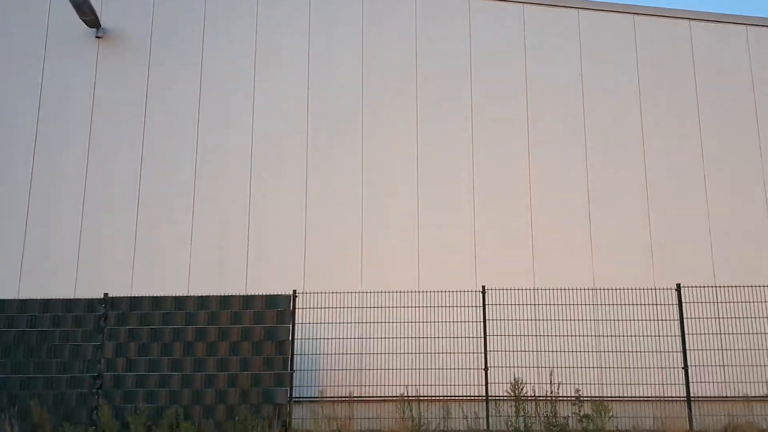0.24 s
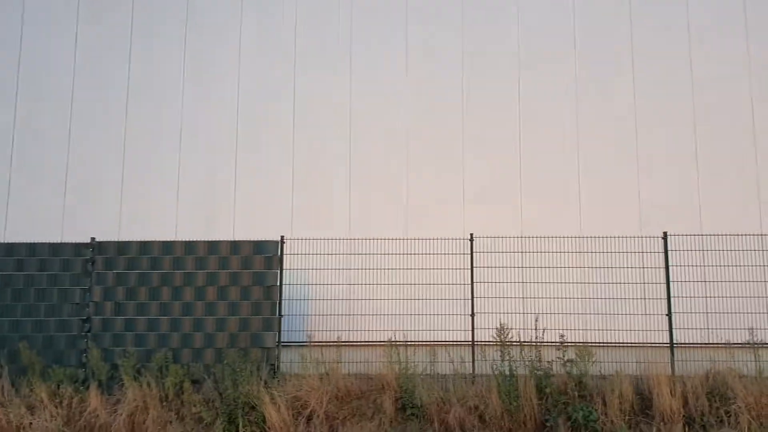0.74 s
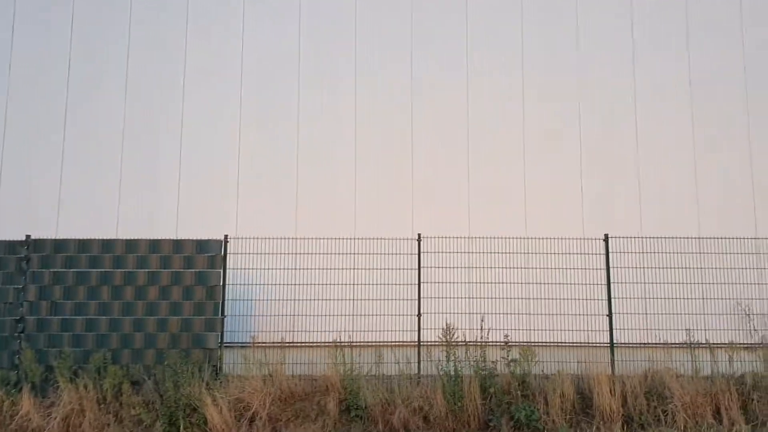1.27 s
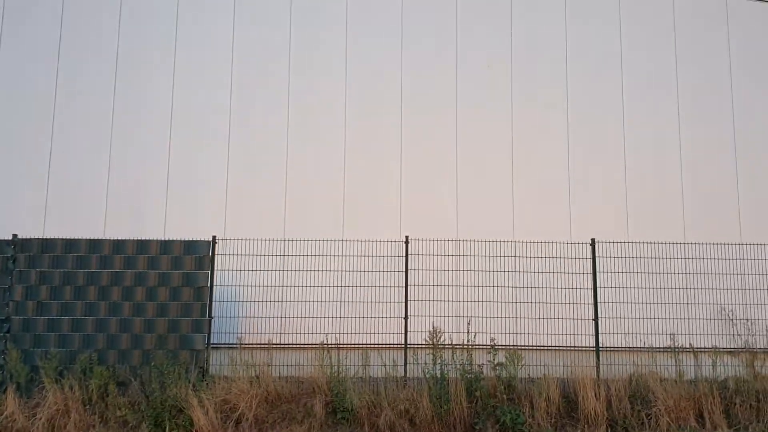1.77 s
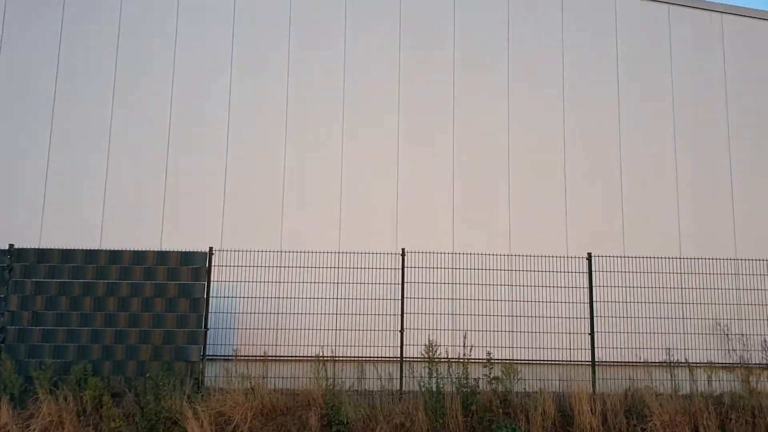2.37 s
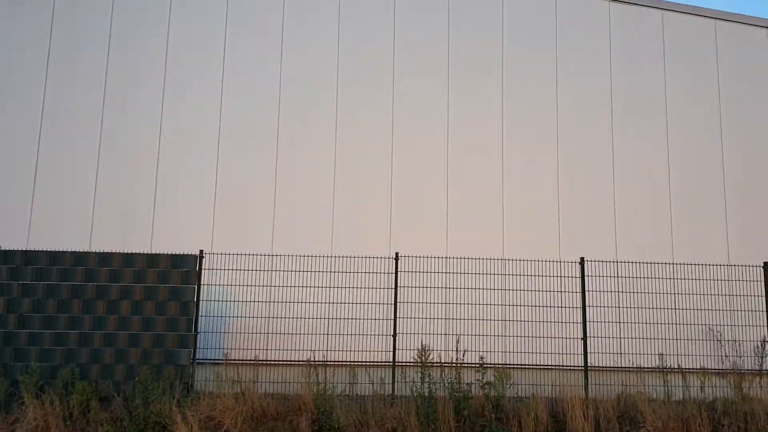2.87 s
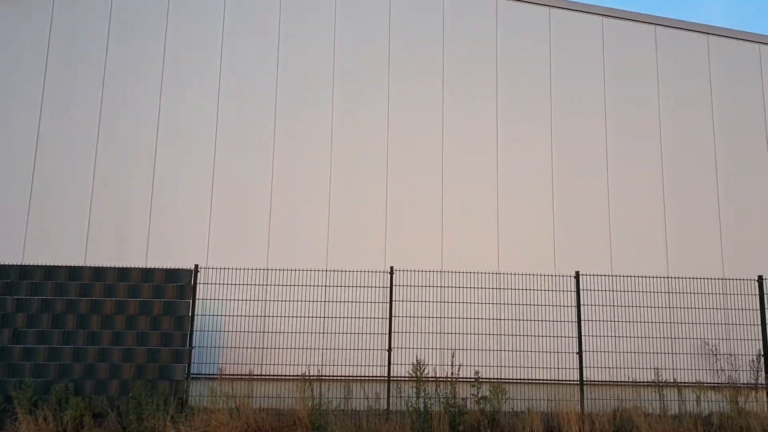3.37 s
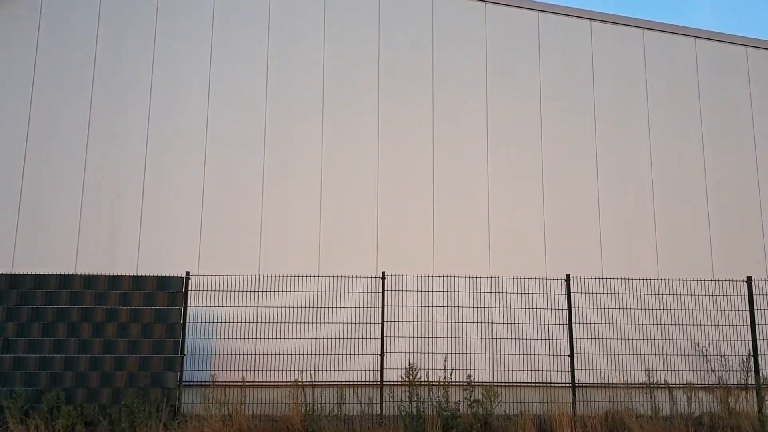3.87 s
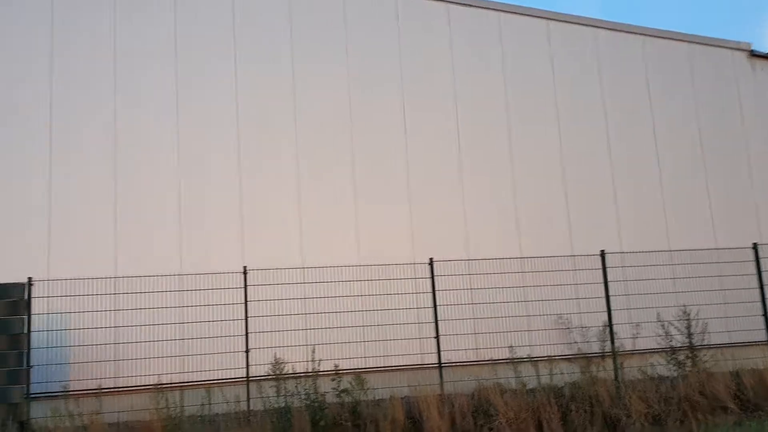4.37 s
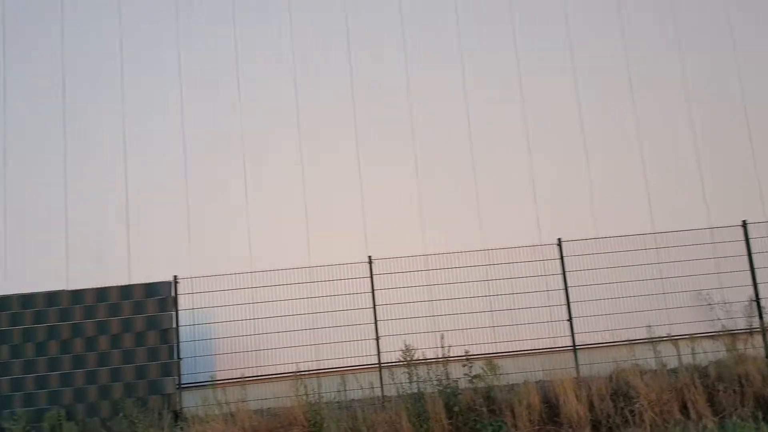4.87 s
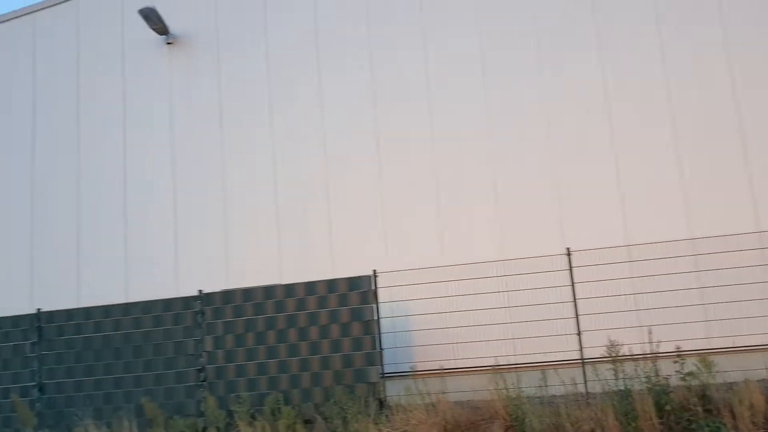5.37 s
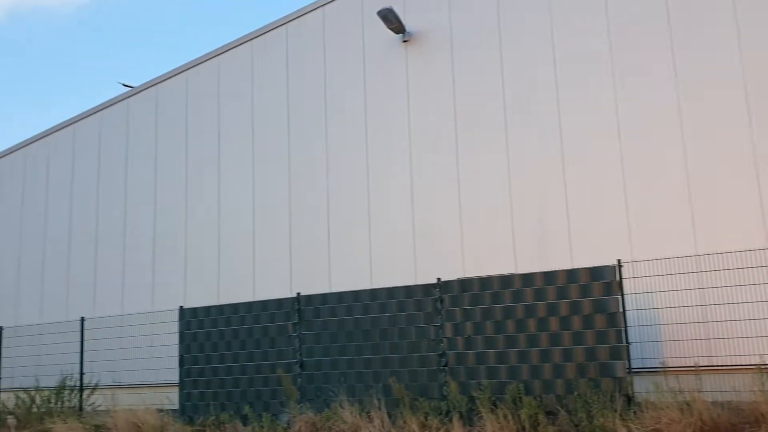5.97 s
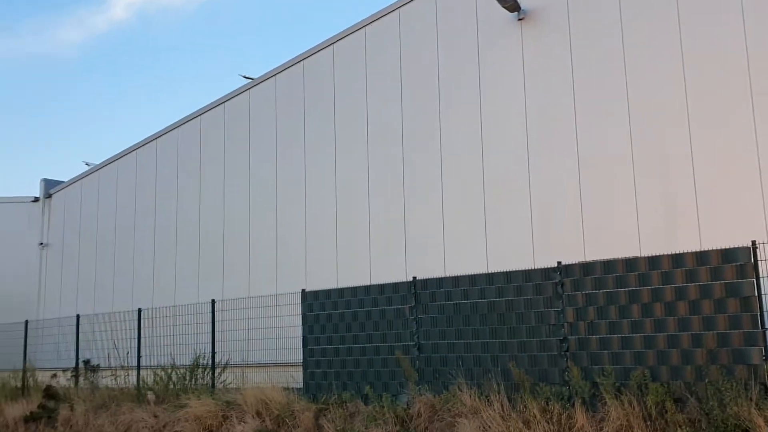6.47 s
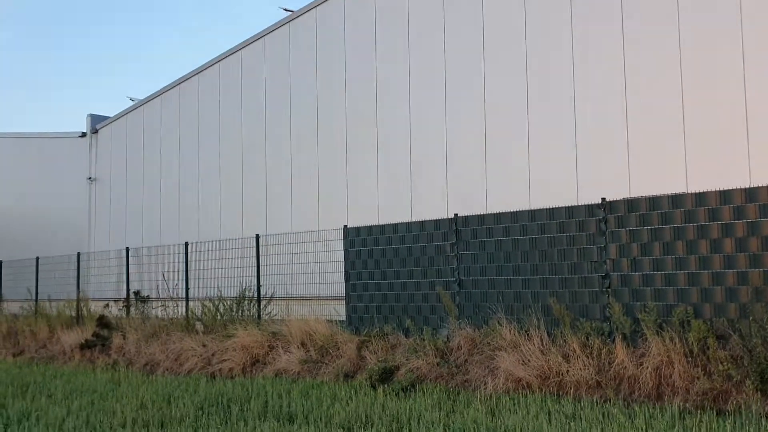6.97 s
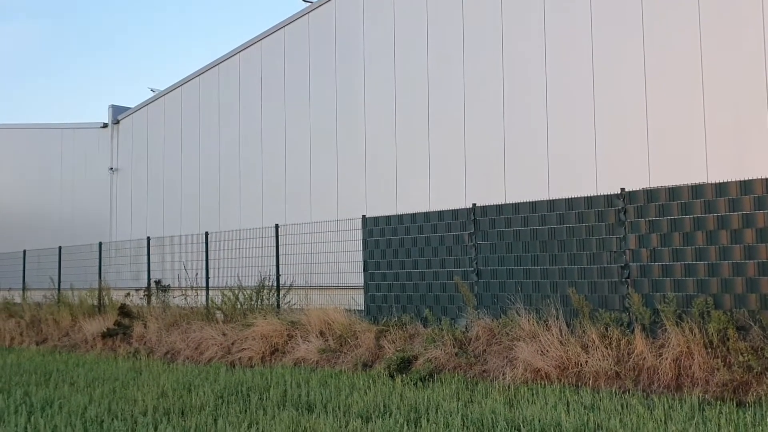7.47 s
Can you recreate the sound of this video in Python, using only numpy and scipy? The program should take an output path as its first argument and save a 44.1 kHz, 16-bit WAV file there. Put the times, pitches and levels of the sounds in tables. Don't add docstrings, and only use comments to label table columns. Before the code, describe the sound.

Heavy machine hums and roars steadily inside a metal hall while dry grass rustles and snaps underfoot; later a loud grinding surge thumps the wall.

```python
import sys
import numpy as np
from scipy import signal
from scipy.fft import rfft, irfft, next_fast_len
from scipy.io import wavfile
from scipy.ndimage import uniform_filter1d

SR = 44100
rng = np.random.default_rng(int(sys.argv[2]) if len(sys.argv) > 2 else 0)


def voltage_ratio(level):
    return 10 ** (np.asarray(level, float) / 20)


def unload_wav(signal):
    wavfile.write(
        sys.argv[1],
        SR,
        np.round(np.clip(np.atleast_2d(signal).T, -1, 1) * 32767).astype(np.int16),
    )


N = 341334

# start_s, beat_hz
KNIFE_SPEED = [(0, 33.42), (1.9, 33.42), (2.1, 33.55), (2.3, 33.44), (5.75, 33.45), (6.0, 32.9),
               (6.2, 32.8), (6.44, 31.6), (6.56, 32.2), (6.7, 33.45), (7.22, 33.45), (7.4, 33.2),
               (7.74, 33.4)]
# start_s, load_db
FEED_LOAD = [(0, 0), (.75, 0), (1.02, 1.7), (1.75, -1.16), (2.02, -2), (2.22, 2.5), (2.56, 2), (2.75, -1),
             (3.15, -2.5), (3.5, 2.5), (4.02, 1.5), (4.2, -1.5), (4.6, -3.5), (4.9, 2.5), (5.35, 1.5),
             (5.72, -1), (6.75, 1.16), (7.74, 0.47)]
# start_s, bite_s, grind_s, size_db, extra_bass_db
LUMPS = [
    (5.739, 0.3022, 0.643, -0.37, 0.03),
    (7.17, 0.249, 0.497, -8.5, 3),
]
# steady_db, slope_db_per_load_db, lump_db, linger_ratio, bass_share_ratio
BOOM_LAW = (-50.5, -0.03, -34.5, 1.37, -1.4)
RUMBLE_LAW = (-42, 1.46, -26, 1.1854, 0.925)
ROAR_LAW = (-48, 1.1458, -29.5, 1.0242, 0.02)
GRIT_LAW = (-61.5, 0.61, -49, 1.1473, .1)
UPPER_LAW = (-42.5, 1.03, -33.5, 0.78, 2)
# law (columns as above), walk_db_per_m, drag_loss_db_per_hz
LOWEST_TONES = [
    ((-39.5, 0.8, -41, 1.55, 5), 0.26, 13),
    ((-42, 1.19, -47.5, -0.16, 3), 2.02, 8.1),
    ((-50.5, 1.6, -58, -0.46, 4.5), 4.9, 9),
]
UPPER_MULTIPLES = [4, 5, 6, 7, 8, 9, 10, 11, 12, 13, 14, 15, 17, 18, 19, 20, 21, 23, 24, 25, 26, 27, 28, 29,
                   30, 31, 32, 36, 37, 39]
# first_spot_db, walk_db_per_m, bend_db_per_m2
UPPER_FIELD = [(-12.5, 1.5, 1.1847), (-2, -5, -0.23), (-17, 2.5, -0.48), (-12, 7.5, -2), (-12, 13.5, -6),
               (-8.5, -6.5, 2.25), (-13, -9.5, 4), (-26.5, 21, -6.5), (-31.5, 11.5, -1.63),
               (-20.5, 5.5, -1.7), (-31.5, 14, -3.5), (-32.5, 14.5, -4), (-26.5, 13.5, -6),
               (-23.5, 5.5, -2.5), (-30.5, 7, -3), (-16, 0.69, -1.5), (-28, -6.5, 4.5), (-20.5, -3.5, 2.5),
               (-17, -3.5, 1.33), (-16, -15.5, 5.5), (-23, -2, 2.32), (-22, 5.5, -1.86), (-22.5, 1.5, 0.89),
               (-20, -12.5, 6.5), (-26, 6.5, -1.14), (-28, 8.5, -3), (-30, 12.5, -4), (-22.5, -20, 9.5),
               (-20.5, 5, -1.2749), (-23, -5.5, 3.5)]
# multiple of a shaft turn, level_db
SHAFT_TONES = [(4, -54.5), (5, -49.5), (7, -52), (8, -54), (10, -62), (14, -59.5)]
# start_s, end_s
STEPS = [
    (.85, 1.215),
    (2.0, 2.14),
    (5.9, 5.97),
]
WALKED_M = [1.275, 1.25, 2.202]
# pitch_hz, level_db (per Hz)
BOOM_COLOUR = [(25, -120), (38, -6.5), (50, 2.5), (58, 0), (68, 2), (90, -6.5), (115, -11.5), (150, -120)]
RUMBLE_COLOUR = [(59, -31), (100, -5), (162, -2.5), (269, -3.5), (356, -8), (396, -9.5), (440, -9),
                 (540, -13), (700, -44.5), (1190, -120)]
ROAR_COLOUR = [(330, -36), (500, -13.5), (560, -15), (700, -3.5), (800, -7), (920, 0), (1250, -4),
               (1400, -11), (1600, -24.5), (2100, -52), (3500, -120)]
GRIT_COLOUR = [(910, -30), (1550, -4), (2250, -1), (2700, -6), (2900, -12), (4370, -16.5), (6070, -26),
               (6600, -39), (7600, -36), (10000, -50.5), (13000, -90.5)]
# pitch_hz, level_db (per Hz)
AIR_COLOUR = [(2000, -54.5), (2900, -16), (3900, -23), (5400, -8.5), (7000, -18), (7850, -25.5),
              (8000, -28.5), (11000, -24), (15000, -24.5), (17000, -15.5)]
# start_s, level_db
VENT_LEVEL = [(0.0, -82.5), (1.75, -76), (3.99, -92.5), (5.76, -104), (6.01, -80), (7.74, -80)]
# pitch_hz, level_db (per Hz)
DUCT_COLOUR = [(5500, -60.5), (6400, -8), (7400, -1), (7850, -1), (8000, -59.5)]
# pitch_hz, likeness_ratio
PORT_LIKENESS = [(60, .989), (200, .992), (330, .96), (560, .95), (800, .8), (1100, .25), (2200, .45),
                 (4000, .1), (7000, .1), (8500, .62)]
# pitch_hz, level_db
PORT_TILT = [(30, 1), (130, .4), (450, .9), (740, .5), (1220, -2), (2010, -7), (3330, -2.5), (5500, 4),
             (9080, -5), (15000, 1.5)]
# pitch_hz, lead_rad
PORT_LEAD = [(30, -.05), (170, -.07), (300, -.2), (670, -.3), (950, -.25), (1300, -.8), (1640, -1.3),
             (2330, -.4), (3270, -2), (6000, 0)]
# centre_s, fine_db, length_s, coarse_over_fine_db
BRUSHES = [(0.003, -77, 0.0304, 17), (0.231, -73, 0.058, 4.5), (.43, -73, 0.052, 1.5),
           (0.619, -67, 0.094, 2.7), (0.792, -68.5, 0.045, 7.5), (0.9, -65, 0.073, 4),
           (1.027, -63.5, 0.0714, 1.42), (1.248, -78, 0.112, 12), (1.641, -72.5, 0.095, 8.5),
           (1.934, -67, 0.107, 7.5), (2.063, -67.5, 0.0466, 8.5), (2.26, -72.5, 0.038, 7.5),
           (2.351, -71, .045, 4.5), (2.621, -86.5, 0.079, 17.5), (2.84, -85.5, 0.084, 6),
           (3.075, -88.5, 0.051, 21), (3.34, -85.5, 0.037, -1), (3.543, -81.5, 0.044, 11)]
SETTLE_DB = (-77, -64.5)
SETTLE_DB_PER_S = (4, 2.5)
# pitch_hz, level_db (per Hz)
FINE_COLOUR = [(4410, -27.5), (7500, 0), (9390, -6), (10800, -3), (12400, -6.5), (14900, -2), (16000, -9.5)]
COARSE_COLOUR = [(1470, -24), (2500, 5.5), (4790, 0.5), (5730, -1), (6720, -2.5), (8200, -27.5),
                 (10700, -40), (18000, -120)]
# start_s, peak_db, left_right_db, middle_hz
BRITTLE_SNAPS = [(.0727, -53, -1, 5300), (0.2377, -42, -5.5, 3900), (0.6909, -46, 4, 4630),
                 (0.7789, -41, 1.02, 4730), (0.9675, -47.5, 2, 5500), (1.943, -41, 6.5, 5430),
                 (1.9603, -52, -3.3, 3800), (1.9818, -49, -10, 4800), (2.039, -36, -7, 4600),
                 (2.0424, -45.5, -0.7, 4700), (2.341, -50, -8, 3500), (3.5062, -46, -11, 4240)]
DRY_SNAPS = [(0.1566, -41, -1.2, 5100), (.2261, -35.5, -4.5, 5300), (0.2676, -45, -0.47, 3900),
             (.4812, -47, -2, 4940), (.8427, -39.5, 3, 5200), (1.9884, -37, 0, 6410),
             (2.0764, -40, -0.1, 5330), (2.0934, -33, -4, 3470), (3.048, -52, 6, 4400),
             (3.095, -47, 5.5, 3600), (3.098, -50, 3.5, 5560), (3.5608, -55.5, 5.5, 4100),
             (3.5974, -47, -3, 4130)]
THICK_SNAPS = [(.641, -50.5, -2, 4700), (.889, -37.5, 2.5, 5460), (0.9658, -46, -11, 2600),
               (1.8711, -50.5, -8, 4500), (2.0302, -49.5, 0.98, 2500), (2.0573, -38, -3, 6500),
               (2.0595, -45, -9, 3900), (2.4266, -50, -11.5, 3420), (3.3642, -53, -9.5, 3380),
               (3.4754, -56, -9.5, 3500), (3.758, -59, 3, 5280), (5.382, -55, 3.3, 4780)]
# low_part_db, high_part_db
STALK_COLOUR = [
    (-14.5, -17),
    (2.5, -12),
    (-1.5, -1),
]
# start_s, level_db
SCUFF_LEVEL = [
    (0, -93),
    (1.33, -94),
    (1.46, -57),
    (1.56, -60.5),
    (1.69, -66.5),
    (1.78, -82),
]
# pitch_hz, level_db (per Hz)
SOLE_COLOUR = [(1200, -37.5), (1800, -8), (2100, -4), (2600, -4.5), (3400, -5), (3800, -16), (5500, -47),
               (9000, -120)]
# centre_s, level_db, pitch_hz, length_s
WALL_JOLTS = [(6.018, -28, 59.59, 0.13), (6.102, -24.5, 57.95, 0.17), (6.264, -25, 61, 0.039),
              (6.345, -29, 58.9, .09), (6.456, -28, 60.54, 0.15), (6.638, -28.5, 62.86, 0.048)]
TOP_HZ = 15800


def unit(x):
    return x / np.sqrt(np.mean(x ** 2) + 1e-20)


def along(points, hz):
    f, v = np.transpose(points)
    return np.interp(np.log(hz + 1), np.log(f + 1), v)


def curves(rows):
    s, *cols = np.transpose(rows)
    return [np.interp(np.arange(N) / SR, s, c) for c in cols]


def wobble(rate):
    count = int(N * rate / SR) + 3
    return np.interp(np.arange(N) * rate / SR, np.arange(count), rng.standard_normal(count))


def filtered(x, response):
    edge = SR // 10
    no_pad = [(0, 0)] * (x.ndim - 1)
    wide = np.pad(x, no_pad + [(edge, edge)], mode="reflect", reflect_type="odd")
    m = next_fast_len(wide.shape[-1])
    spectrum = rfft(wide, m) * response(np.fft.rfftfreq(m, 1 / SR))
    return irfft(spectrum, m)[..., edge:edge + N]


def brightened(x, above_hz, gain_db):
    top = filtered(x, lambda hz: 1 / (1 + (above_hz / (hz + 1)) ** 8))
    return x + (voltage_ratio(gain_db) - 1) * top


def rush(colour, patchy_db, size=12):
    z = signal.stft(rng.standard_normal((2, N)), nperseg=512)[2]
    patches = uniform_filter1d(rng.standard_normal(z.shape[1:]), size=72 // size, axis=0)
    patches = uniform_filter1d(patches, size=size, axis=1)
    pair = signal.istft(z * voltage_ratio(patchy_db * unit(patches)), nperseg=512)[1][:, :N]
    return unit(filtered(pair, lambda hz: voltage_ratio(along(colour, hz))))


def line(angle, db, drift_db, sway):
    start = rng.uniform(0, 2 * np.pi) + sway * wobble(4)
    late = np.array([[0], [rng.choice([-1, 1]) * np.pi / 2]])
    return np.sqrt(2) * voltage_ratio(db + drift_db * wobble(3)) * np.sin(angle + start + late)


def effort(law, lag_s=0):
    steady_db, slope, lump_db, linger, share = law
    t = np.arange(N) / SR - lag_s

    def quarter(s, length):
        return np.pi / 2 * np.clip((t - s) / length, 0, 1)

    lumps = 0
    for s, bite, grind, db, weight_db in LUMPS:
        rise = np.sin(quarter(s, bite)) ** 0.818
        fall = abs(np.cos(quarter(s + bite, linger * grind))) ** 1.993
        lumps = lumps + voltage_ratio(db + share * weight_db) * rise * fall
    steady = voltage_ratio(steady_db + slope * curves(FEED_LOAD)[0])
    return 20 * np.log10(np.hypot(steady, voltage_ratio(lump_db) * lumps))


def knives():
    speed, = curves(KNIFE_SPEED)
    drag_hz = np.maximum(33.05 - speed, 0)
    load_db = effort(UPPER_LAW) - 0.5 * drag_hz
    angle = 2 * np.pi * np.cumsum(speed) / SR
    place_m = np.interp(np.arange(N) / SR, np.ravel(STEPS), np.repeat([0, *WALKED_M], 2)[1:-1])
    hum = 0
    for k, (law, per_m, loss_db) in enumerate(LOWEST_TONES, 1):
        db = effort(law, lag_s=.07) + per_m * place_m - loss_db * drag_hz
        hum = hum + line(k * angle, db, drift_db=0.64, sway=0.13)
    for k, (db, per_m, bend) in zip(UPPER_MULTIPLES, UPPER_FIELD):
        field_db = db + (per_m + bend * place_m) * place_m
        hum += line(k * angle, load_db + field_db, drift_db=1.5, sway=0.15 + .005 * k)
    turn = angle / 3
    for k, db in SHAFT_TONES:
        hum += line(k * turn, db + (load_db + 42.5), drift_db=0.0, sway=1.25)
    return hum, angle


def feed(angle):
    boom_db = effort(BOOM_LAW, lag_s=.18)
    rumble_db = effort(RUMBLE_LAW, lag_s=.04)
    roar_db, grit_db = effort(ROAR_LAW), effort(GRIT_LAW)
    throb = unit(1 + 0.045 * np.cos(angle))
    boom = voltage_ratio(boom_db + 6.0) * rush(BOOM_COLOUR, patchy_db=4.0)
    rumble = brightened(rush(RUMBLE_COLOUR, patchy_db=1), 230, 0.236 * (roar_db + 29.5))
    roar = voltage_ratio(roar_db - 0.5) * rush(ROAR_COLOUR, patchy_db=1.0) * throb
    grit = brightened(rush(GRIT_COLOUR, patchy_db=0.83), 2800, 0.5 * (grit_db + 54.0))
    return boom + voltage_ratio(rumble_db - 3.0) * rumble + roar + voltage_ratio(grit_db + 2.0) * grit * throb


def far_hiss():
    air = voltage_ratio(-75.5) * rush(AIR_COLOUR, patchy_db=0.7)
    vent = voltage_ratio(curves(VENT_LEVEL)[0] - 3.5) * rush(DUCT_COLOUR, patchy_db=1.5)
    return air + vent


def ports(pair):
    def share(hz):
        turn = np.arccos(np.clip(along(PORT_LIKENESS, hz), 0, 1)) / 2
        return np.array([np.cos(turn), np.sin(turn)])

    def left_right(hz):
        half = voltage_ratio(along(PORT_TILT, hz) / 2) * np.exp(.5j * along(PORT_LEAD, hz))
        return np.array([half, 1 / half])

    mid, side = filtered(pair, share)
    return filtered(np.array([mid + side, mid - side]), left_right)


def brushing():
    t = np.arange(N) / SR
    power = voltage_ratio(2 * (np.c_[list(SETTLE_DB)] - np.c_[list(SETTLE_DB_PER_S)] * t))
    for s, db, length, coarse_db in BRUSHES:
        swell = np.exp(-((t - s) / length) ** 2)
        power = power + voltage_ratio([[2 * db], [2 * (db + coarse_db)]]) * swell
    return np.sqrt(power)


def grass():
    fine_gain, coarse_gain = brushing()
    still = np.clip((3.9 - np.arange(N) / SR) / .1, 0, 1)
    hits = (rng.random(N) < 110 / SR) * rng.exponential(1.3, N)
    ticks = signal.lfilter([1], [1, -.96], hits)
    left_right = voltage_ratio([[-.8], [.8]])
    fine = fine_gain * left_right * unit(1 + ticks) * rush(FINE_COLOUR, patchy_db=3.0, size=4)
    coarse = coarse_gain * unit(1 + .3 * ticks) * rush(COARSE_COLOUR, patchy_db=1, size=4)
    flutter = unit(voltage_ratio(1.2 * wobble(70)))
    return still * flutter * (fine + coarse)


def snaps():
    kinds = zip([DRY_SNAPS, THICK_SNAPS, BRITTLE_SNAPS], STALK_COLOUR)
    stalks = [(*row, *colour) for rows, colour in kinds for row in rows]
    s, db, pan_db, middle_hz, low_db, high_db = np.transpose(stalks)
    t = np.arange(-256, 768) / SR
    noise = rng.standard_normal((len(s), 3, len(t)))
    fade = voltage_ratio(-60 * abs(t) / 0.0025) + 0.14 * voltage_ratio(-60 * abs(t) / 0.022)
    crack = (noise[:, :1] + noise[:, 1:]) * (t >= 0) * fade
    hz = np.fft.rfftfreq(len(t), 1 / SR)
    parts = [(1600, .7, low_db + 2.0),
             (middle_hz[:, None, None], .65, -.3),
             (13500, .45, high_db - 0.5)]
    out = np.zeros((2, N + len(t)))
    for centre_hz, octaves, part_db in parts:
        part = irfft(rfft(crack) * np.exp(-(np.log2((hz + 1) / centre_hz) / octaves) ** 2))
        peak = abs(part.mean(axis=1)).max(axis=1)
        part *= (voltage_ratio(db + part_db) / peak)[:, None, None]
        for at, pan, piece in zip(s, pan_db, part):
            first = round((at - .0003 + t[0]) * SR)
            out[:, first:][:, :len(t)] += voltage_ratio([[pan / 2], [-pan / 2]]) * piece
    return out[:, :N]


def scuff():
    return voltage_ratio(curves(SCUFF_LEVEL)[0] + 3.0) * rush(SOLE_COLOUR, patchy_db=2.0, size=4)


def jolts():
    t = np.arange(N) / SR
    out = 0
    for s, db, hz, length in WALL_JOLTS:
        swell = np.cos(np.pi * np.clip((t - s) / length, -.5, .5))
        out = out + swell * line(2 * np.pi * hz * t, db, drift_db=0, sway=.2)
    return out


def scene():
    hum, angle = knives()
    distant = ports(hum + feed(angle) + far_hiss() + jolts())
    steady = distant + grass() + scuff()
    return filtered(steady, lambda hz: hz < TOP_HZ) + snaps()


def low_pass(x):
    return signal.sosfilt(signal.butter(12, 16520, fs=SR, output="sos"), x)


def record(dry):
    closing = np.clip((N - np.arange(N)) / (.008 * SR), 0, 1)
    mix = closing * filtered(dry, lambda hz: hz < TOP_HZ + 650)
    return low_pass(mix)


dry = scene()
out = record(dry)
unload_wav(out)
```